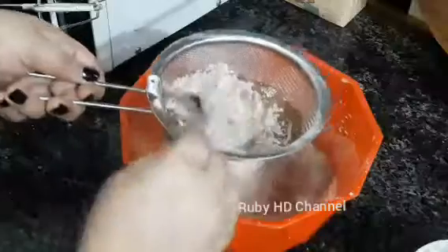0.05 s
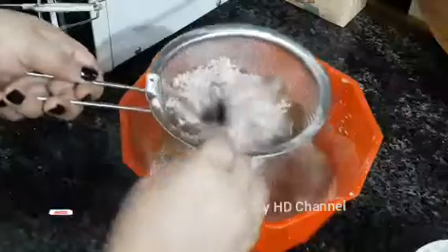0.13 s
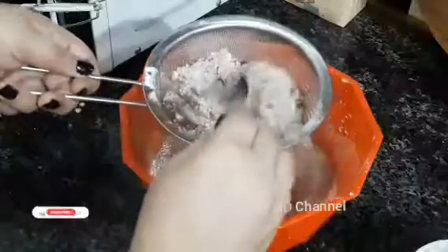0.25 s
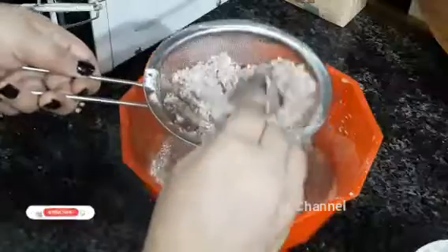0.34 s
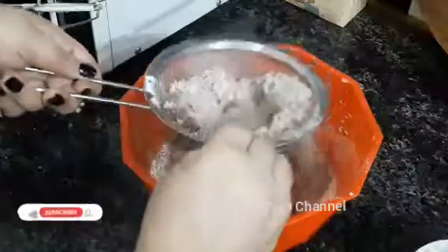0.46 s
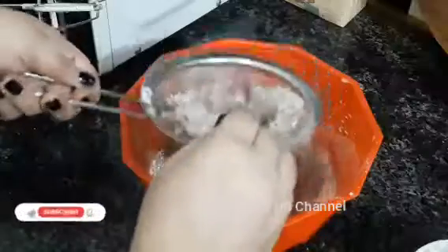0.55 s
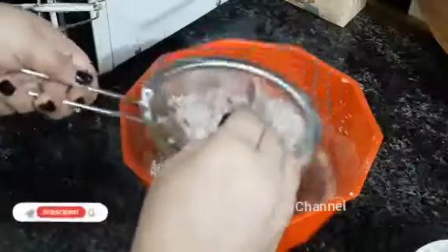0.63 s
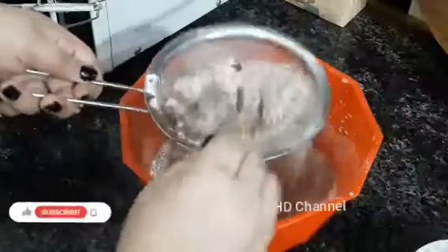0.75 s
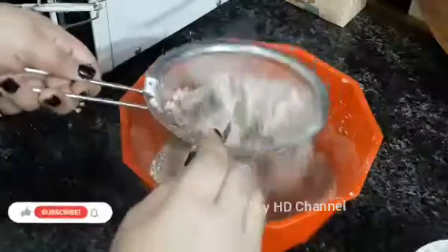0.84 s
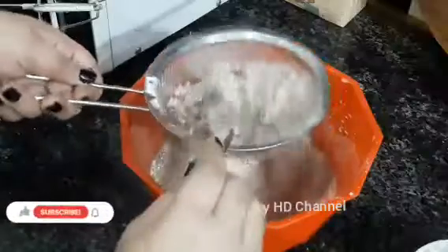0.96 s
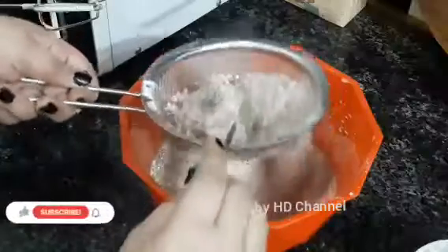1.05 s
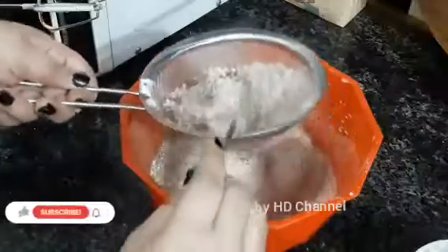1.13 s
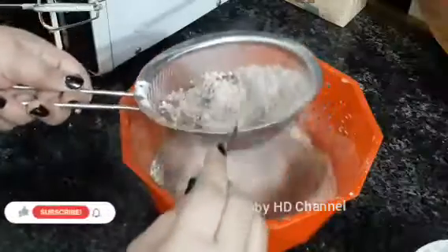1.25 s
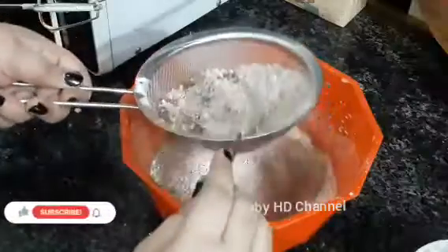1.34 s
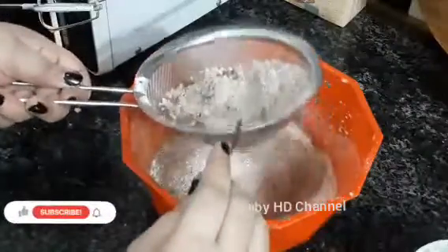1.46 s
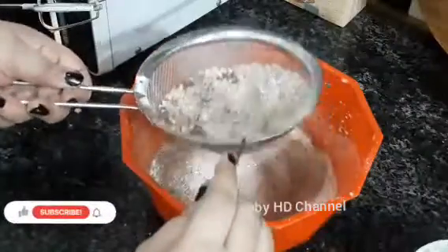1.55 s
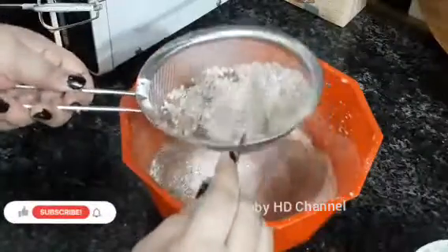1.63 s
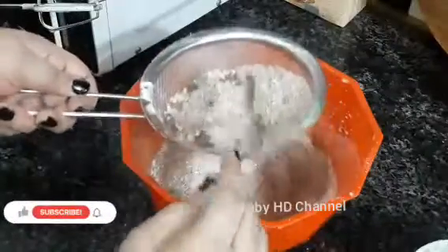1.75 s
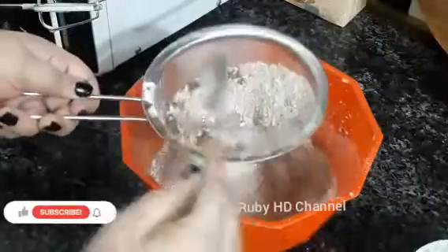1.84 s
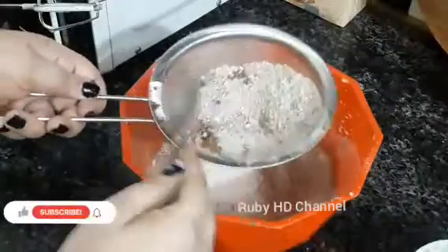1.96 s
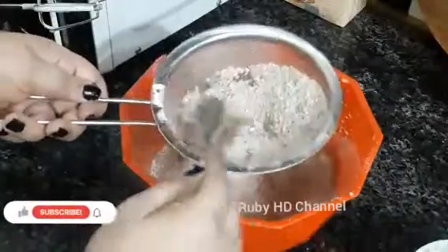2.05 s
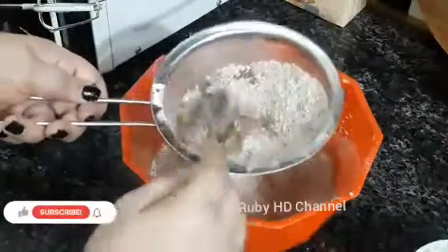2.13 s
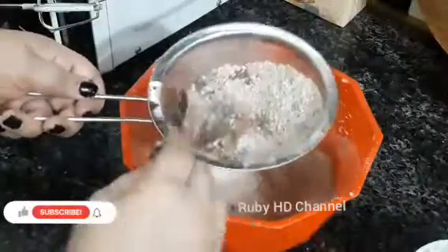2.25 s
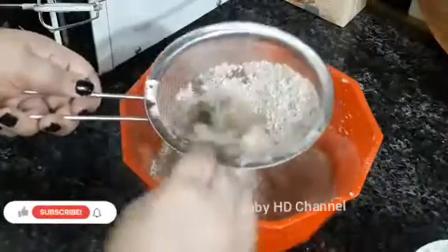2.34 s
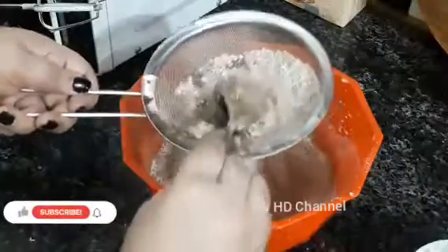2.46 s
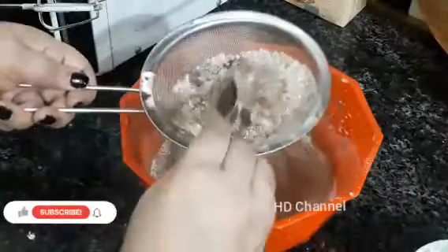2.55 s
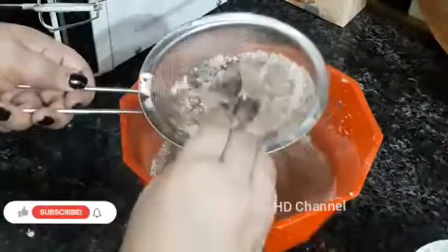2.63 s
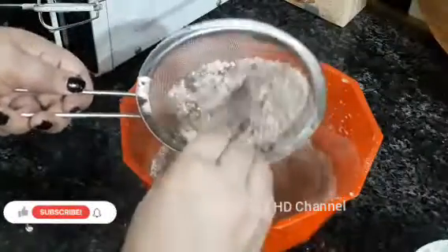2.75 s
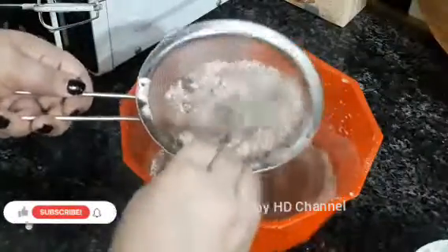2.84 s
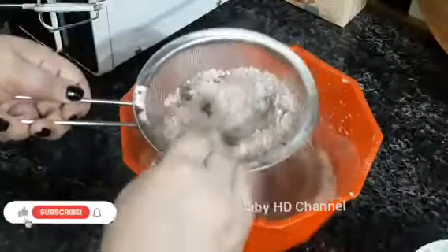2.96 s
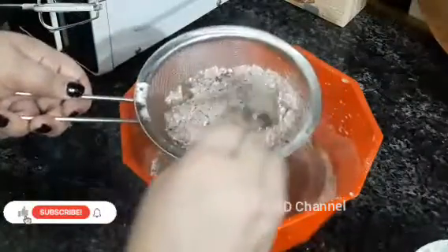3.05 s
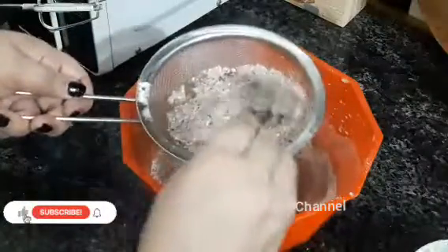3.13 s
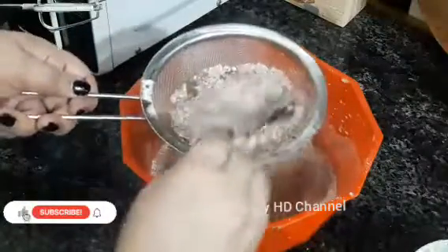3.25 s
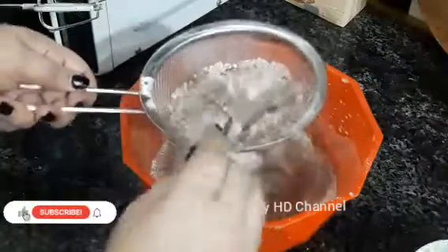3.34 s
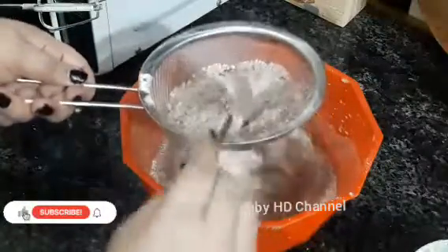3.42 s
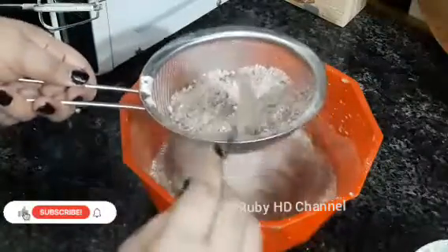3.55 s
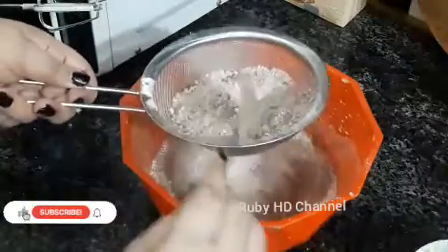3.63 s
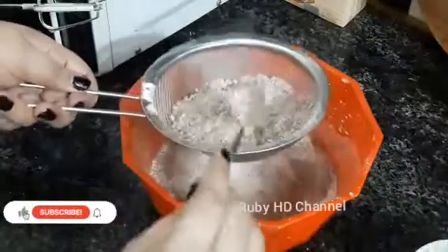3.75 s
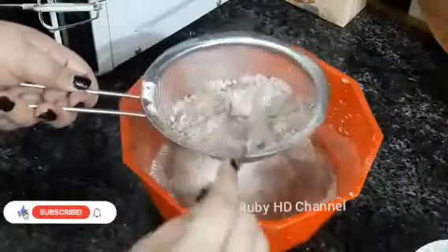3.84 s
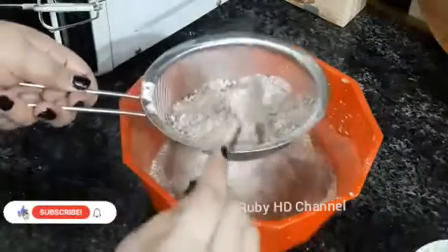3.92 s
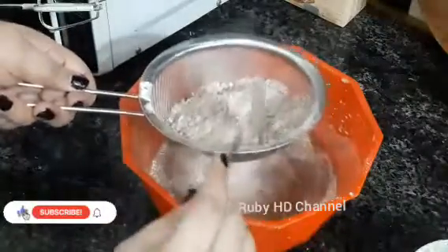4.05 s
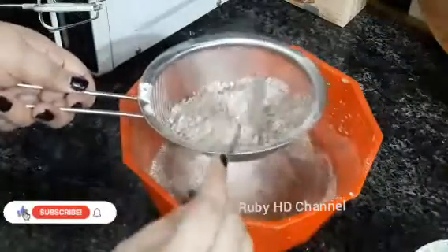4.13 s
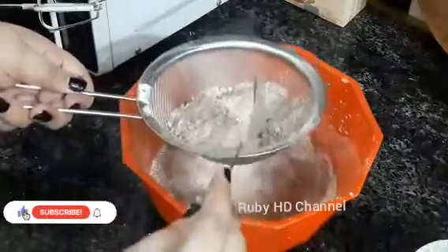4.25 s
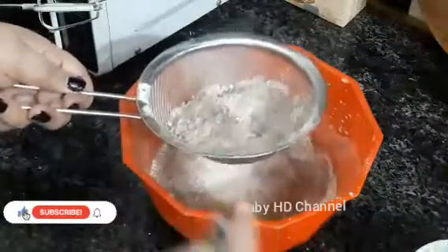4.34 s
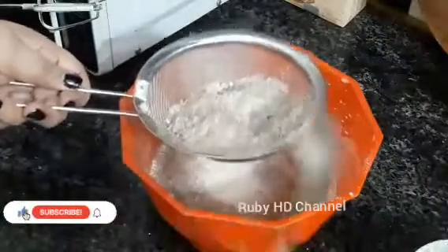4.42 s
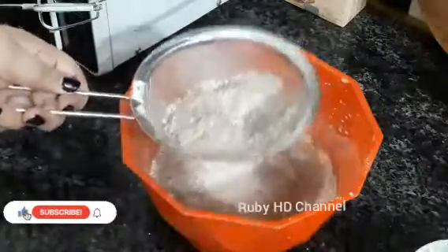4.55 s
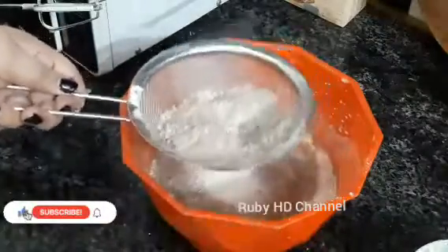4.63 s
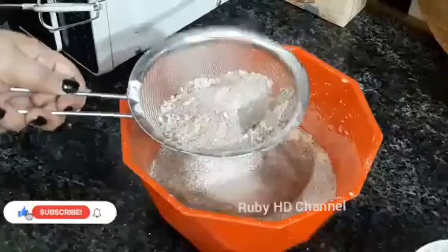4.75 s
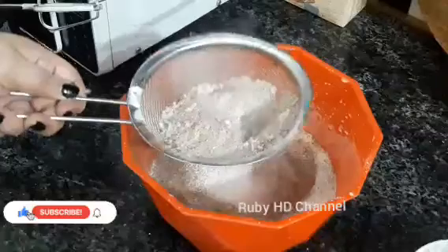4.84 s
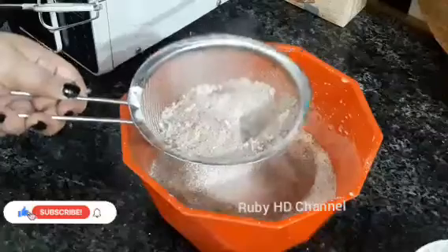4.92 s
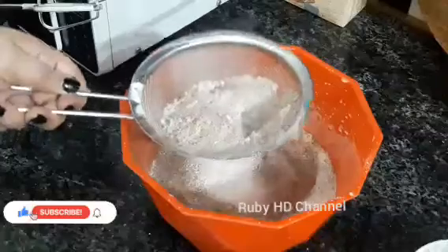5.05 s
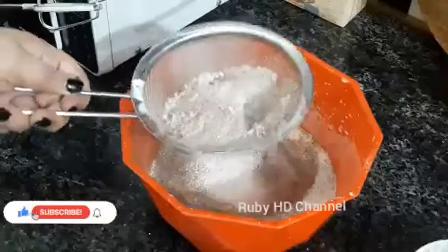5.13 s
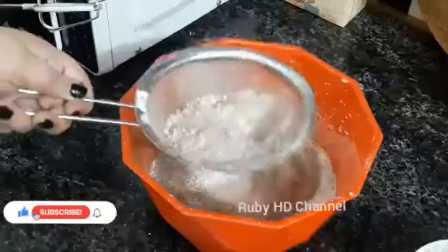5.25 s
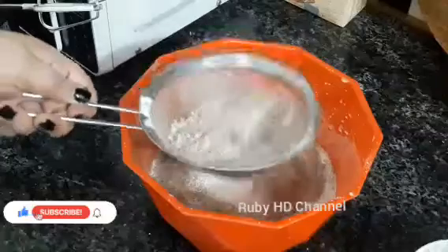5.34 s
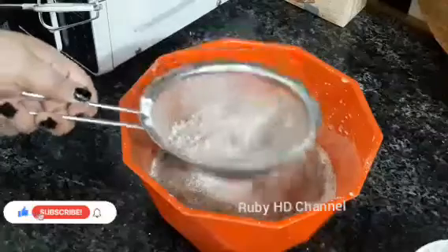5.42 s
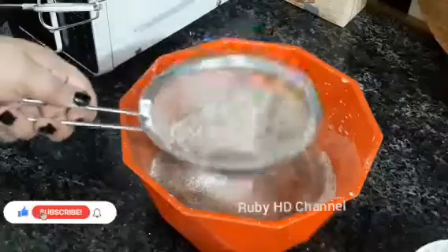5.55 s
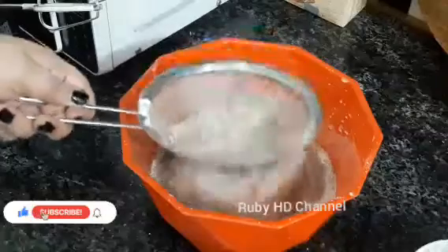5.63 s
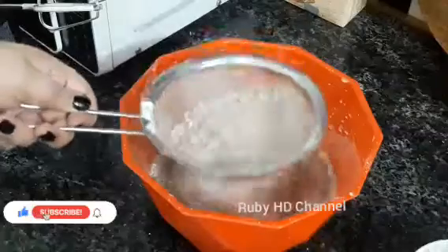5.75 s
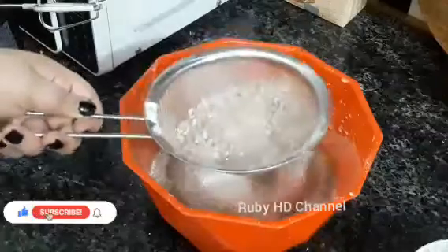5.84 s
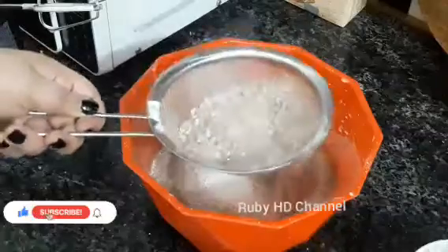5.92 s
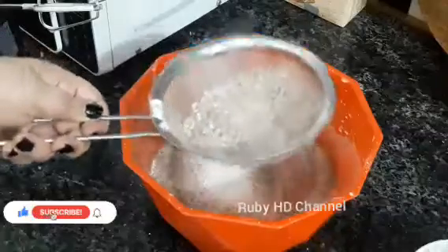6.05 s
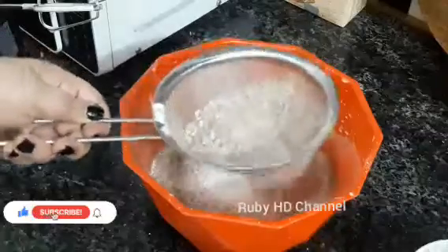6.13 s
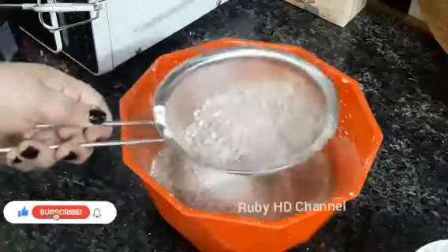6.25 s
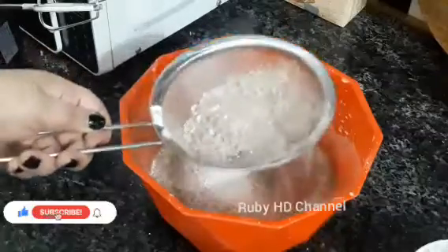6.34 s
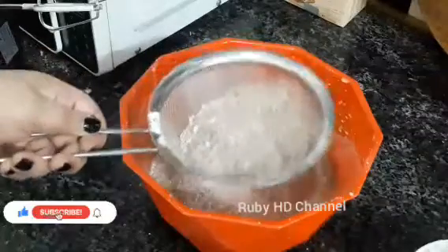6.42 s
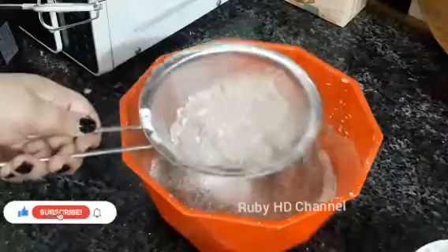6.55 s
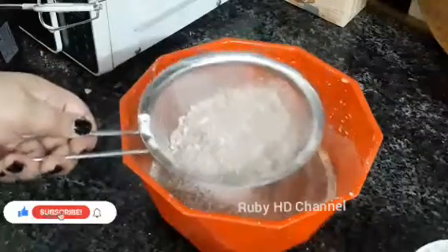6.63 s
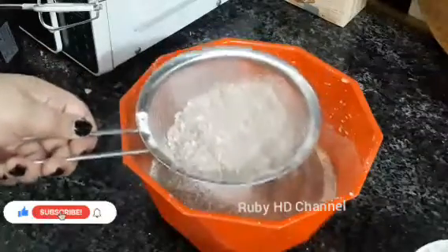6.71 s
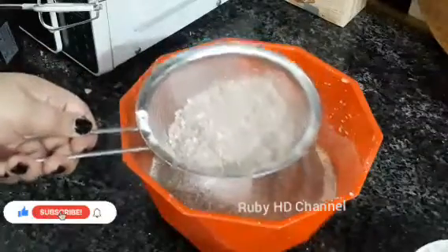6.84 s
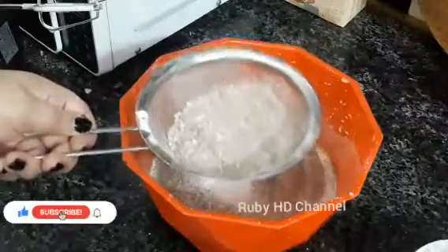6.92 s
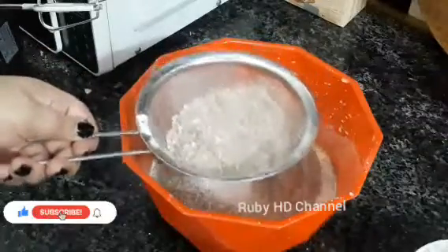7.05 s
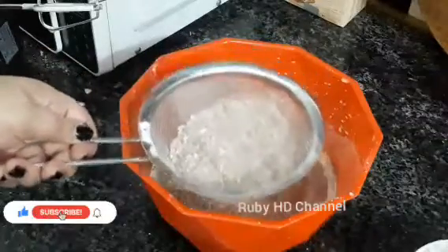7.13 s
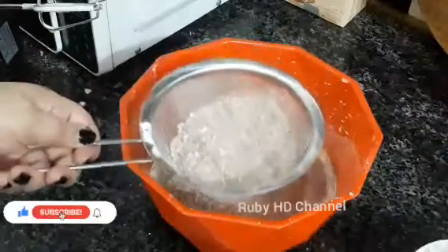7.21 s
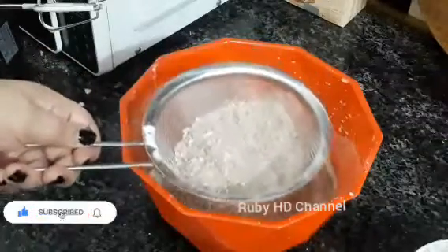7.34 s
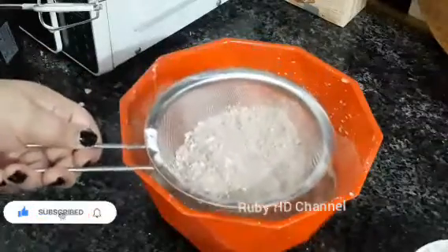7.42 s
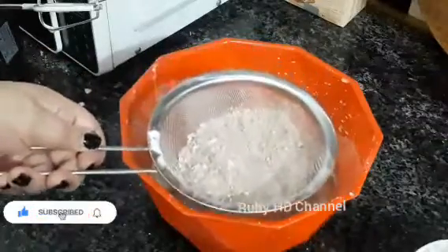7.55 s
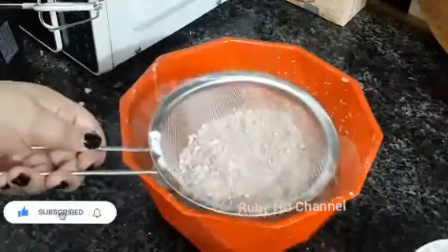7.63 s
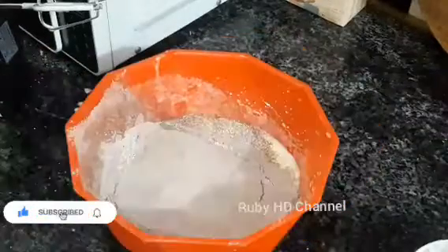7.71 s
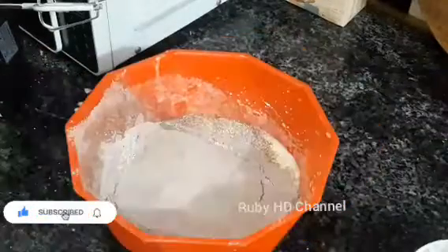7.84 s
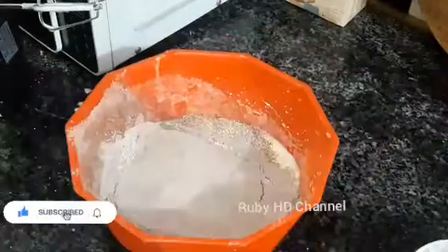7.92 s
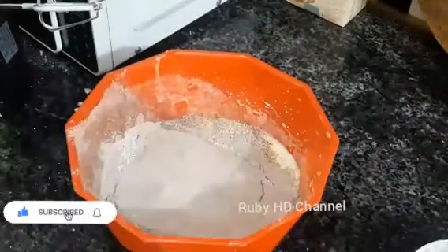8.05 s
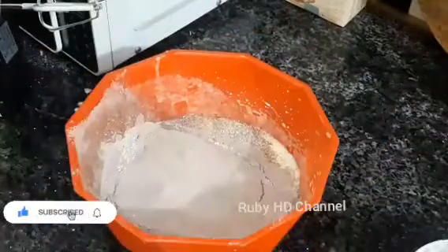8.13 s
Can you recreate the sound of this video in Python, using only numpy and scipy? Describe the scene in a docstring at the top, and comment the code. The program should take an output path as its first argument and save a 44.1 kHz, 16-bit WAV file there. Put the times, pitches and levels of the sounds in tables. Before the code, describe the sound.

A spoon scrapes and taps a small metal sieve, then clatters down, over a low hum and a high chirping cricket.

```python
"""Sifting flour in a kitchen

Flour is worked through a small steel sieve over a plastic bowl, in a room with hard walls.
A spoon scrapes the mesh and knocks on the rim in two runs, making the loose wires sizzle.
It is put down with a clink and a clatter; then the sieve is shaken. Behind this, appliances
hum and a cricket chirps by rubbing its wings. A faint click and a swish come near the end."""
import sys
import numpy as np
from scipy import signal
from scipy.fft import rfft, irfft, next_fast_len
from scipy.io import wavfile
from scipy.ndimage import uniform_filter1d

SR = 44100
rng = np.random.default_rng(int(sys.argv[2]) if len(sys.argv) > 2 else 0)


def master_out(mix):
    """Clip the mix to full scale and print it as 16-bit PCM to the path in sys.argv[1]."""
    frames = np.transpose(np.atleast_2d(mix))
    ceiling = np.clip(frames, -1, 1)
    pcm = np.round(ceiling * 32767).astype(np.int16)
    wavfile.write(sys.argv[1], SR, pcm)


N = 360738
TIME = np.arange(N) / SR

# how long the room echoes; a fade time (t60) is a drop of 60 dB: (frequency [Hz], fade time [s])
ROOM_FADE = [(150, 0.8), (1000, 0.62), (3000, 0.51), (7000, 0.36), (12000, 0.33), (16000, 0.36)]
# hum of the mains power: (frequency [Hz], level [dB])
MAINS_HUM = [(100.2, -40.5), (200.4, -70)]
# motors that run for a while: (start [s], end [s], frequency [Hz], level [dB])
MOTOR_TONES = [(0, 1.0, 240, -57.5), (0, 1.0, 294, -56.5), (0, .8, 355, -65), (7.62, 8.3, 135.2, -49),
               (7.66, 8.3, 205.4, -61)]
# wing strokes in one chirp: (time from its middle [s], relative level [dB], pitch shift [Hz])
CHIRP_STROKES = [(-.025, -6, -60), (-.009, 0, 0), (.010, -1, 40)]

# how dull or bright each noise is: (frequency [Hz], relative level [dB])
AIR_COLOUR = [(25, -5), (50, -8.5), (100, 6.5), (180, 1.5), (350, 0.5), (750, -4.5), (1300, -15),
              (1900, -26.5), (2400, -17.5), (3000, -31.5), (4000, -31), (6000, -27.5), (9500, -42.5),
              (15000, -25)]
SWISH_NOISE_COLOUR = [(300, -13), (1500, -8), (2500, 0), (5000, 2), (9000, -14), (15000, -21)]
RASP_COLOUR = [(300, -6), (1300, 7), (2200, -2), (4500, 1.5), (6100, 2), (7200, 11.5), (8500, -11.5),
               (12000, -2), (15500, -3)]
CLATTER_COLOUR = [(160, -27), (320, -7.5), (700, -0.5), (1300, 1), (2000, -5.5), (3200, -10), (4200, -19.5),
                  (6500, -18.5), (9000, -39), (15000, -48)]
CLACK_COLOUR = [(200, -16), (500, -6), (900, -8.5), (1300, -6), (3000, -3.5), (4800, -2), (6000, 2.5),
                (7200, 5.5), (8200, -12.5), (11000, -23)]
SIZZLE_COLOUR = [(3000, -22), (6500, -2.5), (8500, -7.5), (11500, 3.5), (14000, 1.5), (15500, -1),
                 (17000, -6)]

# the tones each thing rings with: (frequency [Hz], relative level [dB], fade time [s])
THUMP_TONES = [(45, 9, .07)]
WIRE_TONES = [(2410, 2.5, .012), (3620, -9, 0.011), (5030, -3.5, 0.018)]
BASKET_TONES = [(252.6, -9.5, 0.15), (361, -8.5, 0.075), (491.4, -1, 0.096), (551, -3, 0.059),
                (751, 1.5, 0.016), (1211, 1.5, 0.023), (1860, -8.5, 0.03), (4050, -12.5, 0.044),
                (5340, -9, .03)]  # the sieve's basket and rim
HELD_SPOON_TONES = [(2585, -10, 0.2), (5017, -15, 0.11), (5920, -9, 0.083), (6110, 0, 0.078)]
FREE_SPOON_TONES = [(2535, -18, 0.41), (3770, -20, 0.4), (3880, -3.5, 0.079), (4940, -2, 0.11),
                    (5024, -11, 0.085), (5050, 2.5, 0.11), (5460, -14, 0.3), (6024, -12, 0.26),
                    (7770, -13, 0.19), (10400, -20, 0.15), (11000, -21, 0.16), (11320, -17.5, 0.29),
                    (13600, -8.5, .12), (14570, -12, .17), (15170, -15, .14)]
SURFACE_TONES = [(332, -6.5, 0.32), (675, -3, 0.29), (884, -7, 0.37), (940, -11, 0.21), (1060, -5, 0.23),
                 (1132, -1.5, 0.15), (1370, -15, .3), (1376, 0, 0.17), (1460, -6, 0.4), (1508, -4, 0.26),
                 (1520, -13, 0.3), (2180, -14, .2), (2841, 3.5, 0.3), (2830, -12, 0.18), (3180, -15, 0.18)]  # what the spoon lands on

# flour sliding on the mesh, one curve per spell of stirring or shaking: (time [s], strength [dB])
FLOUR_SLIDES = [
    [(0.12, -63.5), (0.464, -69.5), (1.15, -69)],
    [(4.42, -68), (4.488, -64), (4.7, -69), (4.95, -68.5)],
    [(5.3, -59), (5.436, -75), (6.392, -68.5), (7.0, -78)],
]
# spoon scrapes: (middle [s], half length [s], rasp level [dB], push on the basket over the rasp [dB])
SPOON_SCRAPES = [(0.048, 0.059, -49.5, -1), (2.027, 0.054, -44, -6), (2.329, 0.043, -45, -2),
                 (2.838, .025, -60.5, -8), (3.215, 0.031, -42, 6)]
# parts of the spoon land: (time [s], clink strength [dB], clatter strength [dB], first bounce gap [s])
SPOON_LANDINGS = [(4.994, -15, -30.5, 0.021), (5.046, -38, -18, .026), (5.056, -30, -11, .039)]
# the spoon hits the rim: (time [s], strength [dB], cushioning by flour [0-1])
RIM_KNOCKS = [(0.607, -51.5, 0.1), (0.824, -56, 0), (1.188, -31.5, 0.04), (1.274, -36.5, 0.4),
              (1.3626, -29.5, 0.11), (1.517, -38, 0.2), (1.526, -31, 0.03), (1.5713, -38.5, 0.8),
              (1.6807, -30, .15), (1.9595, -31.5, 0.74), (2.2411, -47.5, 0.63), (3.494, -25, 0.22),
              (3.6725, -26, 0.17), (3.8466, -28, 0.1), (4.0174, -30.5, 0.17), (4.1863, -25, 0),
              (4.573, -53.5, 0.1)]


def amp(db):
    """Turn decibels into a number to multiply a sound by."""
    return 10 ** (np.asarray(db) / 20)


def rms_one(x):
    """Scale a sound so that its average level (rms) is 1."""
    return x / np.sqrt(np.mean(x ** 2) + 1e-20)


def at_hz(points, hz):
    """Read between the rows of a table, giving every octave the same width."""
    known_hz, values = np.transpose(points)
    return np.interp(np.log(hz + 1e-9), np.log(known_hz), values)


def coloured(noise, colour):
    """Turn the lows and highs of a noise up or down to follow a colour table; rms 1."""
    size = next_fast_len(N)
    gain = amp(at_hz(colour, np.fft.rfftfreq(size, 1 / SR)))
    return rms_one(irfft(rfft(noise, size) * gain, size)[:N])


def band_pass(x, low_hz, high_hz):
    """Keep mainly the sound between two frequencies."""
    return signal.sosfilt(signal.butter(2, [low_hz, high_hz], "band", fs=SR, output="sos"), x)


def grains(per_s, spread_db):
    """Tiny clicks of uneven size at random moments."""
    clicks = (rng.random(N) < per_s / SR) * rng.choice([-1, 1], N)
    return clicks * amp(spread_db * np.minimum(rng.exponential(1, N), 4))


def blows(times, levels_db, rise_s, t60):
    """Loudness curve of hits that swell quickly and die away."""
    power = np.zeros(N)
    for time, db in zip(times, levels_db):
        start = int(time * SR)
        age = TIME[:min(N - start, SR // 2)]
        swell = 1 - np.exp(-age / rise_s)
        power[start:start + len(age)] += (swell * amp(db - 60 * age / t60)) ** 2
    return np.sqrt(power)


def ring(force, hz, t60):
    """Each push starts one pure tone that fades away."""
    decay, angle = amp(-60 / (t60 * SR)), 2 * np.pi * hz / SR
    return signal.lfilter([0, np.sin(angle)], [1, -2 * decay * np.cos(angle), decay ** 2], force + 1e-18)


def struck(times, levels_db, tones, uneven_db):
    """Every hit sets an object's tones ringing, in a slightly different mix each time."""
    out = np.zeros(N)
    for hz, db, t60 in tones:
        force = np.zeros(N)
        hit_db = levels_db + db + uneven_db * rng.standard_normal(len(times))
        force[(times * SR).astype(int)] = amp(hit_db)
        out += ring(force, hz, t60) * rng.choice([-1, 1])
    return out


def bowed(slips, tones):
    """A stream of tiny slips keeps an object ringing, as a bow does a string; rms 1."""
    return rms_one(sum(amp(db) * ring(slips, hz, t60) / np.sqrt(t60) for hz, db, t60 in tones))


def kitchen_echo(build_up_s):
    """The walls answer a click with a wash of echoes whose highs die first."""
    age, edges_hz = TIME[:int(0.7 * SR)], np.geomspace(80, 18000, 12)
    echo = np.zeros(len(age))
    for low, high in zip(edges_hz, edges_hz[1:]):
        band = band_pass(rng.standard_normal(len(age)), low, high)
        echo += band * amp(-60 * age / at_hz(ROOM_FADE, np.sqrt(low * high)))
    echo *= 1 - np.exp(-(age / build_up_s) ** 2)
    return echo / np.sqrt(np.sum(echo ** 2))


def in_kitchen(x, echo_db):
    """A sound together with its echoes from the walls."""
    return x + amp(echo_db) * signal.fftconvolve(x, kitchen_echo(build_up_s=0.0014))[:N]


def appliances(air_db):
    """A soft rush of moving air, mains hum, and motor tones that come and go."""
    out = amp(air_db) * coloured(rng.standard_normal(N), AIR_COLOUR)
    for hz, db in MAINS_HUM:
        out += np.sqrt(2) * amp(db) * np.sin(2 * np.pi * (hz * TIME + rng.random()))
    for start, end, hz, db in MOTOR_TONES:
        running = np.clip(np.minimum(TIME - start, end - TIME) / 0.05, 0, 1)
        out += np.sqrt(2) * amp(db) * running * np.sin(2 * np.pi * hz * TIME)
    return out


def click_and_swish(click_s, click_db, swish_s, swish_db):
    """A faint dry click with a low thump, and later a soft swish."""
    click = blows([click_s], [click_db], rise_s=0.0003, t60=0.017)
    swish = amp(swish_db) * np.exp(-((TIME - swish_s) / 0.053) ** 2)
    thump = struck(np.array([click_s]), click_db, THUMP_TONES, uneven_db=2)
    return thump + (click + swish) * coloured(rng.standard_normal(N), SWISH_NOISE_COLOUR)


def cricket(pitch_hz, glide_hz, stroke_s, rough_hz, overtone_db):
    """Each wing stroke drags tiny teeth over a scraper: a short, rough tone that slides up; rms 1."""
    gaps_s = 0.10472 + 0.000034 * np.arange(76)  # the chirps slow very slightly
    chirp_times = 0.072 + np.append(0, np.cumsum(gaps_s))
    loudness, hz = np.zeros(N), np.full(N, float(pitch_hz))
    for middle in chirp_times:
        for offset, db, shift_hz in CHIRP_STROKES:
            centre = middle + offset + rng.normal(0, 0.00048)
            span = slice(*np.searchsorted(TIME, [centre - stroke_s / 2, centre + stroke_s / 2]))
            progress = (TIME[span] - centre) / stroke_s
            loudness[span] += amp(db + rng.normal(0, 0.54)) * np.cos(np.pi * progress)
            hz[span] = pitch_hz + shift_hz + glide_hz * progress
    uneven_teeth = np.tanh(rms_one(uniform_filter1d(rng.standard_normal(N), size=60)))
    phase = 2 * np.pi * np.cumsum(hz + rough_hz * uneven_teeth) / SR
    return rms_one(loudness * (np.sin(phase) + amp(overtone_db) * np.sin(2 * phase)))


def from_a_nook(song, nook_t60, nook_db, room_db):
    """Surfaces around a hiding place scatter the sound at once; the room answers later; rms 1."""
    age = TIME[:SR // 20]
    nook_echo = rng.standard_normal(len(age)) * amp(-60 * age / nook_t60)
    scattered = rms_one(signal.fftconvolve(song, nook_echo)[:N])
    near = rms_one(song + amp(nook_db) * scattered)
    far = rms_one(signal.fftconvolve(song, kitchen_echo(build_up_s=0.019))[:N])
    return rms_one(near + amp(room_db) * far)


def mesh_rubs():
    """Spoon and flour catch on wire after wire: the tiny slips rasp and make the metal ring."""
    flour = sum(np.interp(TIME, times, amp(db), left=0, right=0)
                for times, db in map(np.transpose, FLOUR_SLIDES))
    rasp_level, basket_level, wire_level = amp(-2) * flour, amp(1.5) * flour, amp(-6) * flour
    for middle, half_length, rasp_db, push_db in SPOON_SCRAPES:
        stroke = np.exp(-((TIME - middle) / half_length) ** 2)
        rasp_level += amp(rasp_db) * stroke
        basket_level += amp(rasp_db + push_db) * stroke
    slips = grains(per_s=4300, spread_db=0.5)
    cushioned = band_pass(slips, 260, 1700)  # flour softens the push
    rasp = rasp_level * (coloured(slips, RASP_COLOUR) + amp(-9) * bowed(slips, HELD_SPOON_TONES))
    wires = wire_level * bowed(slips, WIRE_TONES)
    basket = basket_level * bowed(cushioned, BASKET_TONES)
    return in_kitchen(rasp + wires + basket, echo_db=-4.5)


def bounces(hits, gap_shrink, loss_db):
    """Each landing leads to ever quicker, weaker bounces: times, clink and clatter strengths."""
    rows = []
    for time, clink_db, clatter_db, gap in SPOON_LANDINGS:
        for k in range(hits):
            rows.append((time, clink_db - k * loss_db, clatter_db - k * loss_db))
            time += gap * gap_shrink ** k
    return np.transpose(rows)


def spoon_put_down():
    """One end of the spoon lands with a clink; the other drops and rattles on something hollow."""
    times, clink_db, clatter_db = bounces(hits=4, gap_shrink=0.85, loss_db=5.5)
    clink = struck(times, clink_db - 8, FREE_SPOON_TONES, uneven_db=1.5)
    crack = blows(times, clink_db - 6.5, rise_s=0.0028, t60=0.061)
    crack *= coloured(rng.standard_normal(N), RASP_COLOUR)
    clatter = blows(times, clatter_db - 2, rise_s=0.00029, t60=0.064)
    clatter *= coloured(rng.standard_normal(N), CLATTER_COLOUR)
    surface = struck(times, clatter_db - 18, SURFACE_TONES, uneven_db=2)
    return in_kitchen(crack + clatter, echo_db=-4) + in_kitchen(clink + surface, echo_db=-3)


def jolts(rebound_s, rebound_loss_db, hardest_shake_s, shake_gap_s):
    """Knocks that each bounce once, and five shakes that swell and fade: times, strengths, cushioning."""
    knocks = np.array(RIM_KNOCKS)
    rebounds = knocks + [rebound_s, -rebound_loss_db, 0]
    shakes = [(hardest_shake_s + k * shake_gap_s, -53 - 7 * abs(k), 0) for k in range(-2, 3)]
    return np.vstack([knocks, rebounds, shakes]).T


def sieve_knocks_and_shakes():
    """At each jolt the rim clacks, the loose wires sizzle, and basket and spoon ring briefly."""
    times, strength_db, cushion = jolts(rebound_s=0.039, rebound_loss_db=16.5,
                                        hardest_shake_s=5.5815, shake_gap_s=0.198)
    # a cushion of flour muffles the wires but passes more of the push to the basket
    sizzle_db = strength_db + 10 - 21.5 * cushion
    basket_db = -24 + 0.6 * strength_db + 10.5 * cushion
    # clack and sizzle are each a sharp burst plus a quieter, longer buzz
    clack = blows(times, strength_db + 7.5, rise_s=0.0011, t60=0.026)
    clack += blows(times, strength_db - 7.5, rise_s=0.0095, t60=0.41)
    clack *= coloured(grains(per_s=14000, spread_db=3), CLACK_COLOUR)
    sizzle = blows(times, sizzle_db + 2, rise_s=0.0013, t60=0.019)
    sizzle += blows(times, sizzle_db - 13.5, rise_s=0.0043, t60=0.3)
    sizzle *= coloured(grains(per_s=14000, spread_db=3.5), SIZZLE_COLOUR)
    basket = struck(times, basket_db, BASKET_TONES, uneven_db=2)
    spoon = struck(times, strength_db - 13.5, HELD_SPOON_TONES, uneven_db=7)
    return in_kitchen(clack + sizzle + spoon, echo_db=-7) + in_kitchen(basket, echo_db=-3)


def scene():
    """Everything reaches one microphone, so left and right are the same."""
    sifting = sieve_knocks_and_shakes() + mesh_rubs() + spoon_put_down()
    song = cricket(pitch_hz=7335, glide_hz=485, stroke_s=0.023, rough_hz=195, overtone_db=-37)
    chirps = amp(-46.5) * from_a_nook(song, nook_t60=0.05, nook_db=4, room_db=-1)
    small_noises = click_and_swish(click_s=7.651, click_db=-47.5, swish_s=8.17, swish_db=-50.5)
    return np.tile(sifting + chirps + small_noises + appliances(air_db=-50.5), (2, 1))


def record(dry):
    """The microphone loses the deep bass, and the very highest sounds are cut off sharply."""
    bass_cut = signal.butter(2, 55, "high", fs=SR, output="sos")
    treble_cut = signal.ellip(10, 0.2, 70, 15700, fs=SR, output="sos")
    return signal.sosfilt(treble_cut, signal.sosfilt(bass_cut, dry))


dry = scene()
out = record(dry)
master_out(out)
```